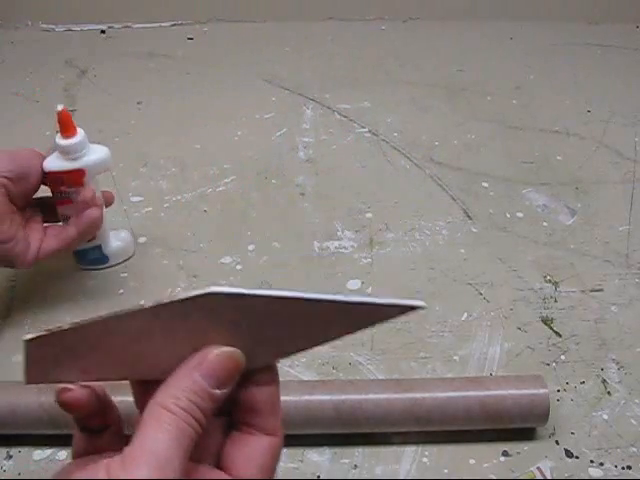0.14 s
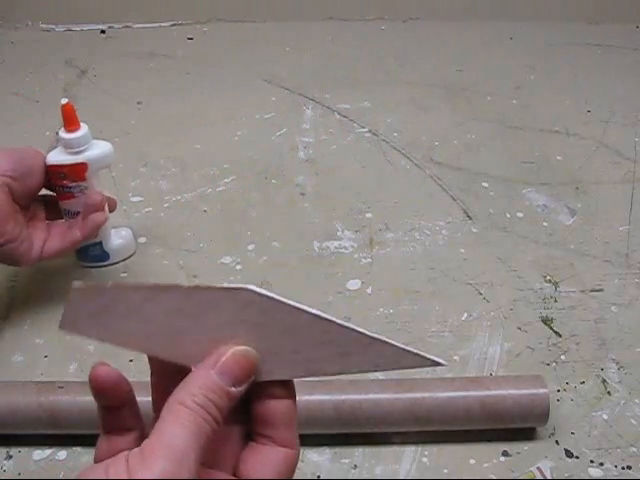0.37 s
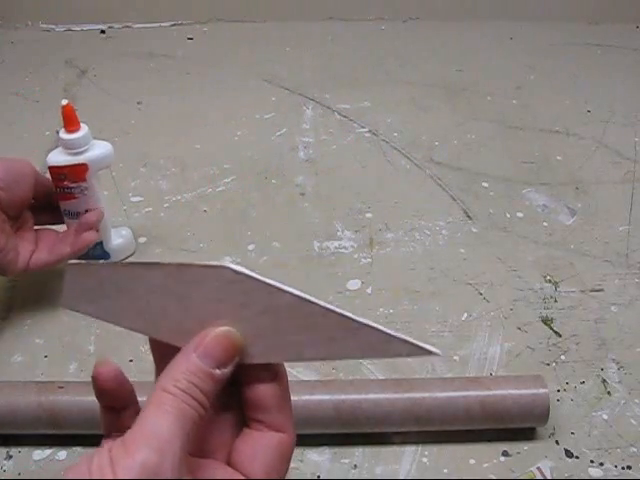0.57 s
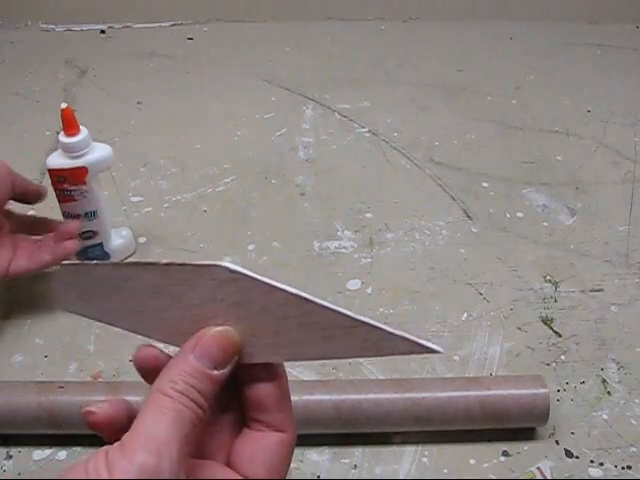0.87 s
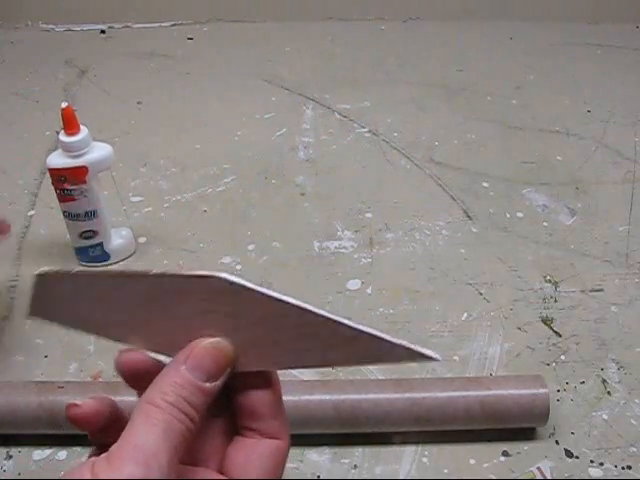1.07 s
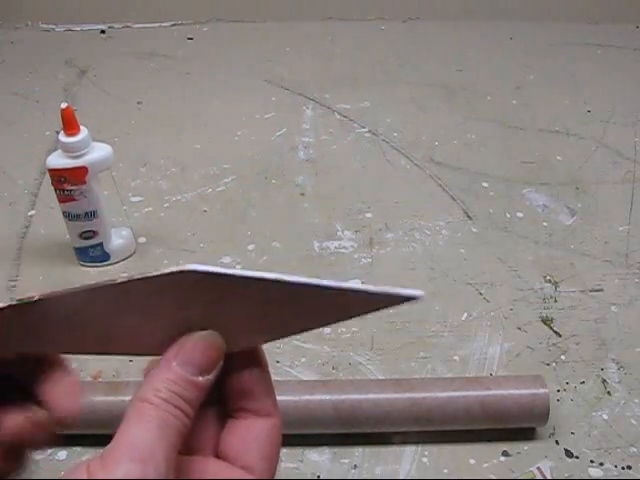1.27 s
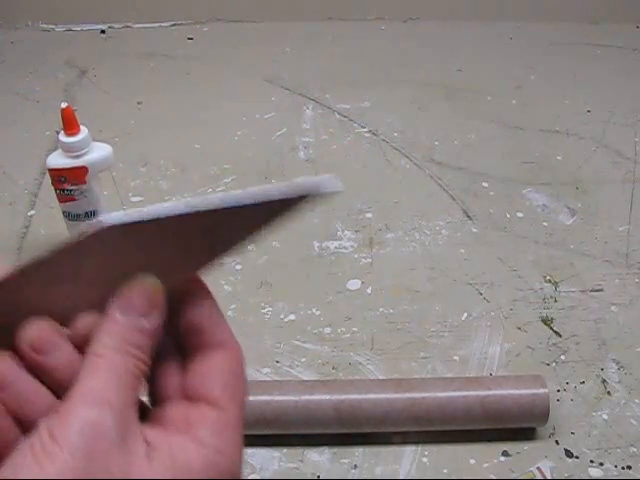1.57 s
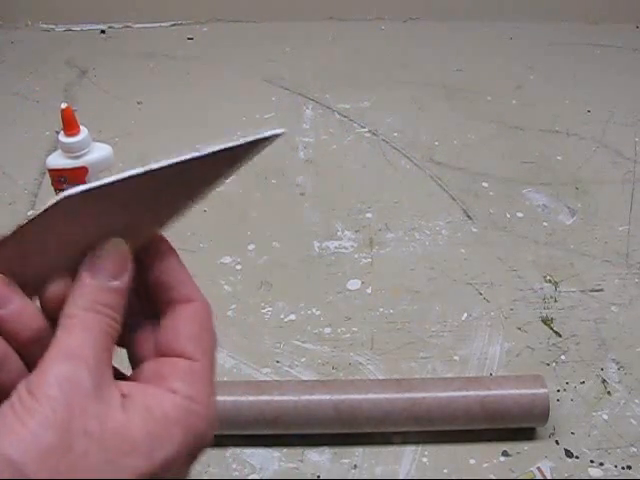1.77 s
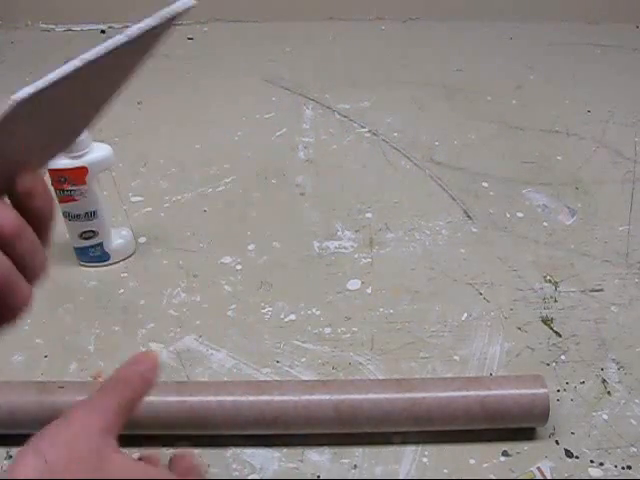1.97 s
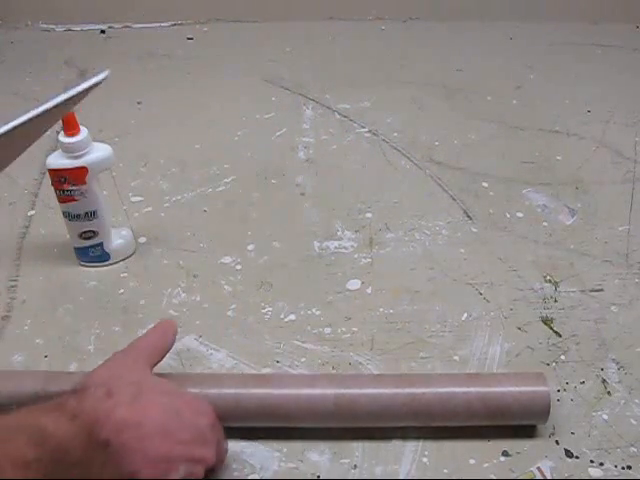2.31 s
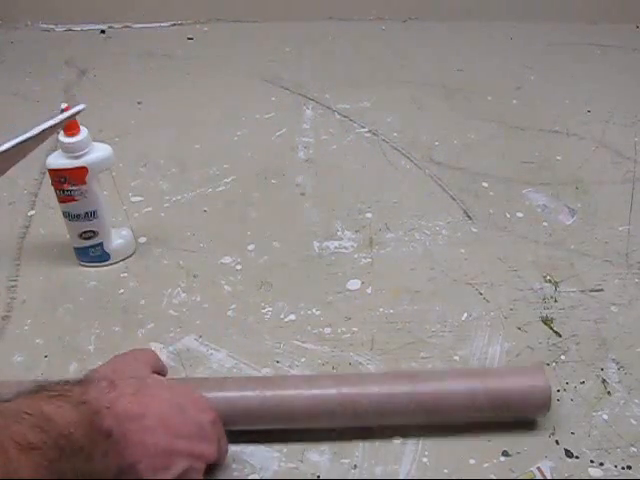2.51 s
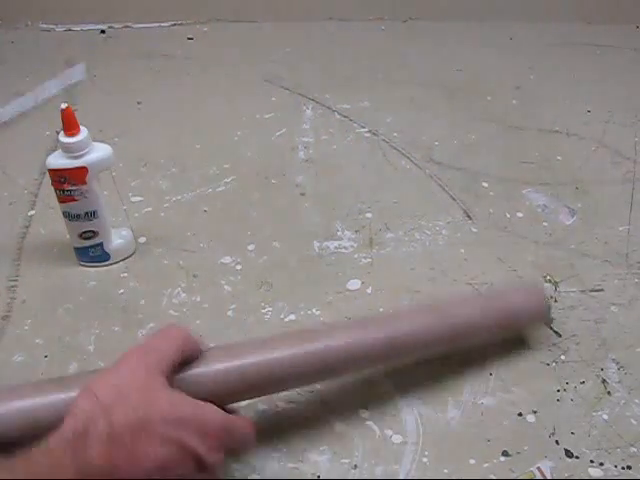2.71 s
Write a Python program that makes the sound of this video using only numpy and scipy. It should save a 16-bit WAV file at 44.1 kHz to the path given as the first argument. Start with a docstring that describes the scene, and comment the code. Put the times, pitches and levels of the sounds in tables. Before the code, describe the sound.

Plastic bottle and cardboard tube knock on a workbench, with light finger rubs and a scrape.

```python
"""A workbench in a small, dry room. A plastic glue bottle lands, rocks flat and is nudged as the fingers
let go; the bench top rings and flexes. Fingers tap and rub a thin wooden blank. A hand bumps a cardboard
tube, which knocks, rings and is dragged off the bench. Impacts are force pulses, rubs and drag are dense
tiny slips; both drive damped modes. The room answers briefly over faint hum and hiss."""
import sys
import numpy as np
from scipy import signal
from scipy.fft import rfft, irfft
from scipy.io import wavfile
from scipy.ndimage import uniform_filter1d

SR = 44100
rng = np.random.default_rng(int(sys.argv[2]) if len(sys.argv) > 2 else 0)


def waveform_to_disk(signal):
    """Save audio, clipped to [-1, 1], as 16-bit WAV at the path in sys.argv[1]."""
    frames = np.transpose(np.atleast_2d(signal))
    scaled = np.clip(frames, -1, 1) * 32767
    samples = np.round(scaled).astype(np.int16)
    wavfile.write(sys.argv[1], SR, samples)


N = 125685
T = np.arange(N) / SR
RING_T = T[:SR * 3 // 4]
TOP_HZ = 7000

# hum partials (frequency [Hz], rms level [dB])
HUM_PARTIALS = [(120, -71.5), (359, -62.5), (482, -61.5), (598, -63), (719, -62.5)]
# spectral shapes (frequency [Hz], relative level [dB])
HISS_SPECTRUM = [(25, -8.5), (250, -7.5), (350, -4), (470, -2.5), (750, -9.5), (850, -9.5), (1500, -11.5),
                 (1870, -8), (2100, -13.5), (3400, -13.5), (4600, -13.5), (7000, -26.5)]
RUB_SPECTRUM = [(150, -2), (600, -2.5), (1100, -4.5), (2000, -2.5), (3300, -3.5), (4500, -3.5),
                (6000, -6.5), (7000, -20)]
BOTTLE_SPECTRUM = [(25, -21), (50, -10), (100, 1), (400, -7.5), (650, -18), (850, -17.5), (1800, -16.5),
                   (3000, -20.5), (5000, -12.5), (7000, -21.5)]
TUBE_SPECTRUM = [(50, -37), (120, 2), (250, -7), (800, 0.5), (1100, -13), (1500, -10.5), (2500, -18.5),
                 (4500, -9.5), (7000, -14)]
DRAG_SPECTRUM = [(80, 2.5), (270, 9), (400, -5.5), (700, 0), (1000, -10.5), (1600, 1), (2700, -5.5),
                 (3700, -5), (5500, -10), (7000, -21)]
# skin on wood and cardboard (peak time [s], level [dB], rise [s], fall [s])
FINGER_RUBS = [(.01, -50, 0.032, 0.047), (.569, -47.5, 0.013, 0.0133), (1.2814, -45, 0.00058, .004),
               (1.477, -40, 0.0013, 0.019), (1.76, -47.5, 0.0028, 0.027), (1.861, -52, 0.049, 0.12),
               (1.88, -40.5, 0.011, 0.0045), (2.26, -42.5, 0.075, 0.046), (2.377, -43, 0.035, 0.039),
               (2.69, -45.5, 0.035, 0.024), (2.84, -45.5, 0.087, 0.072)]
# taps on bottle and blank (time [s], level [dB], frequency [Hz], t60 [s])
FINGER_TAPS = [(.3925, -26.5, 418, 0.038), (.5635, -32, 427, 0.037), (1.2815, -26.5, 3450, 0.009),
               (1.282, -29.5, 4360, 0.0028)]
# contacts with the bench (time [s], level [dB], pulse rise [ms])
BOTTLE_LANDING = [(.2032, 1, 0.091), (.2072, -20, .14), (.2175, -12.5, 0.16), (.2275, -13, 0.11),
                  (.2445, -8, 0.47), (.2582, -18.5, 0.028), (.296, -38.5, .05), (.5632, -20, 0.21)]
BOTTLE_NUDGES = [(.318, -26.5, 2), (.422, -14, 2.2), (.488, -12, 1.5), (.598, -8, 1.52), (.607, -17, 2.1),
                 (.64, -21.5, 0.4), (.72, -8.5, 1.7), (.745, -16.5, 0.41), (.762, -9, 2.1),
                 (.797, -32, 2.2), (.819, -17.5, 1.5)]
TUBE_KNOCKS = [(2.2052, -2.5, 0.071), (2.272, -15.5, 0.084), (2.4074, 2.5, 0.076), (2.480, -13, 1.1),
               (2.534, 5.5, 0.9), (2.5435, -3, 0.63), (2.5625, -3, 0.43), (2.569, -2.5, 1.4)]
# tube sliding on the bench (time [s], level [dB])
DRAG_FORCE = [(2.470, -76.5), (2.472, -31.5), (2.489, -44), (2.502, -36), (2.529, -33.5), (2.56, -28),
              (2.58, -39.5), (2.62, -48.5)]
# modes (frequency [Hz], t60 [s], level [dB])
THIN_WALL_MODES = [(1140, 0.014, -32.5), (2780, 0.02, -25.5), (3360, 0.012, -28.5), (4230, 0.015, -18.5)]  # blank and tube wall
BENCH_TOP_MODES = [(48, 0.24, -36), (88.9, 0.47, -9), (134.6, 0.37, -6.5), (248, 0.42, -7.5),
                   (292.6, 0.22, -3.5), (342, 0.064, -3.5), (378.2, 0.18, 1.5), (427, 0.093, -8.5),
                   (555, 0.15, -5), (597, 0.18, -6.5), (648.4, 0.27, -8)]
BENCH_FLEX_MODES = [(115, 0.41, 0), (169, 0.33, -3.5)]
TUBE_MODES = [(226, 0.19, -5), (248, 0.14, 1), (338.7, 0.11, -3), (520, 0.16, -6), (593, 0.069, -8.5),
              (736, .08, -12), (771, 0.053, -6), (864, .13, -8), (1099, 0.087, -6), (1164, 0.12, -16.5),
              (1356, .15, -30.5), (1960, 0.11, -15.5)]
# struck-body response (thud [dB], modes [dB], diffuse ring [dB], its bass t60 [s], its treble t60 [s])
BOTTLE_RESPONSE = (6, -18, 8, 0.6, 0.37)
TUBE_RESPONSE = (1, -28, -6.5, 1, 2.2)
# nearby surfaces (delay [s], gain [ratio])
BOTTLE_REFLECTIONS = [(.0043, 0.086), (0.0119, 0.11)]
TUBE_REFLECTIONS = [(.0039, 0.25), (0.0121, 0.39), (0.0143, .45), (.0226, .25)]


def undb(db):
    """Decibels to gain."""
    return 10 ** (np.asarray(db) / 20)


def unit_rms(x):
    """Scale to rms 1."""
    return x / np.sqrt(np.mean(x ** 2))


def through(x, response):
    """Convolve with an impulse response."""
    return signal.fftconvolve(x, response)[:N]


def low_cut(x, hz):
    """High-pass: removes deep bass below the given frequency."""
    return signal.sosfilt(signal.butter(2, hz, "high", fs=SR, output="sos"), x)


def colour(spectrum, size=4096):
    """Minimum-phase, unit-energy response of a spectrum, rolled off above TOP_HZ."""
    hz, db = np.array(spectrum).T
    bin_hz = np.arange(size // 2 + 1) * SR / size
    gain = undb(np.interp(np.log(bin_hz + 1), np.log(hz), db))
    gain /= np.hypot(1, (bin_hz / TOP_HZ) ** 2)
    cepstrum = irfft(np.log(gain))
    cepstrum[1:size // 2] *= 2
    cepstrum[size // 2 + 1:] = 0
    response = irfft(np.exp(rfft(cepstrum)))
    return response / np.linalg.norm(response)


def mode(age_s, hz, t60_s):
    """Damped sine, silent before age 0."""
    age_s = np.maximum(age_s, 0)
    return np.sin(2 * np.pi * hz * age_s) * np.exp(-np.log(1000) * age_s / t60_s)


def ringing(modes):
    """Impulse response of modes, alternating in sign."""
    return sum((-1) ** k * undb(db) * mode(RING_T, hz, t60_s) for k, (hz, t60_s, db) in enumerate(modes))


def diffuse(bass_t60_s, treble_t60_s, build_s=0.001):
    """Countless weak modes: octave bands of noise, each with its own decay."""
    size = len(RING_T)
    noise = rfft(rng.standard_normal(size))
    bin_hz = np.arange(len(noise)) * SR / size
    octave = np.log2(bin_hz / 60 + 1e-6).clip(0, 7)
    ring = 0
    for k, t60_s in enumerate(np.geomspace(bass_t60_s, treble_t60_s, 8)):
        band = irfft(noise * np.maximum(1 - abs(octave - k), 0), size)
        ring += band * np.exp(-np.log(1000) * RING_T / t60_s)
    ring *= 1 - np.exp(-RING_T / build_s)
    return ring / np.linalg.norm(ring)


def background(hiss_db=-49.5, drift_ratio=0.00383):
    """Slightly wavering hum, steady hiss."""
    hum = 0
    for hz, db in HUM_PARTIALS:
        drift = unit_rms(uniform_filter1d(rng.standard_normal(N), size=8000))
        phase = 2 * np.pi * np.cumsum(hz * (1 + drift_ratio * drift)) / SR
        hum += undb(db) * np.sqrt(2) * np.sin(phase)
    hiss = unit_rms(through(rng.standard_normal(N), colour(HISS_SPECTRUM)))
    return hum + undb(hiss_db) * hiss


def friction(spread_db, slips_per_s=2500):
    """Dense tiny slips, random in time and sign."""
    slips = rng.random(N) < slips_per_s / SR
    return unit_rms(slips * rng.choice([-1, 1], N) * undb(spread_db * rng.standard_normal(N)))


def finger_rubs(hiss_db=3):
    """Skin slips under swelling, fading pressure; thin walls resonate."""
    pressure = sum(undb(db) * np.exp(-np.maximum((peak_s - T) / rise_s, (T - peak_s) / fall_s))
                   for peak_s, db, rise_s, fall_s in FINGER_RUBS)
    slips = low_cut(pressure * friction(spread_db=1.5), hz=550)
    hiss = undb(hiss_db) * through(slips, colour(RUB_SPECTRUM))
    return hiss + through(slips, ringing(THIN_WALL_MODES))


def contact_force(contacts):
    """One pulse per contact; longer is duller."""
    force = np.zeros(N)
    for start_s, db, rise_ms in contacts:
        age = np.maximum(T - start_s, 0) * 1000 / rise_ms
        pulse = age * np.exp(-np.minimum(age, 60))
        force += undb(db) * pulse / pulse.sum()
    return force


def strike(force, modes, spectrum, response):
    """Struck body: short thud, diffuse ring, distinct modes."""
    thud_db, modes_db, diffuse_db, bass_t60_s, treble_t60_s = response
    thud = through(force, colour(spectrum))
    ring = through(thud, diffuse(bass_t60_s, treble_t60_s))
    tones = through(force, ringing(modes))
    return undb(diffuse_db) * ring - undb(thud_db) * thud + undb(modes_db) * tones


def reflected(x, reflections):
    """Direct sound plus echoes off nearby surfaces."""
    return x + sum(gain * np.interp(T - delay_s, T, x, left=0) for delay_s, gain in reflections)


def bench_flex(force, build_s=0.0087):
    """Deep modes of the whole bench; its mass is slow to start swinging."""
    return through(force, ringing(BENCH_FLEX_MODES) * (1 - np.exp(-RING_T / build_s)))


def bottle(flex_db=-27):
    """Bottle lands, rocks and is nudged; the bench rings and flexes."""
    force = contact_force(BOTTLE_LANDING) + contact_force(BOTTLE_NUDGES)
    knocks = strike(force, BENCH_TOP_MODES, BOTTLE_SPECTRUM, BOTTLE_RESPONSE)
    return reflected(knocks, BOTTLE_REFLECTIONS) + undb(flex_db) * bench_flex(force)


def finger_taps():
    """Each light tap rings one short mode."""
    return sum(undb(db) * mode(T - start_s, hz, t60_s) for start_s, db, hz, t60_s in FINGER_TAPS)


def tube_knocks(flex_db=-33):
    """Tube hits the bench and rings; the bench adds the bass."""
    force = contact_force(TUBE_KNOCKS)
    knocks = reflected(strike(force, TUBE_MODES, TUBE_SPECTRUM, TUBE_RESPONSE), TUBE_REFLECTIONS)
    return low_cut(knocks, hz=116) + undb(flex_db) * bench_flex(force)


def tube_drag(modes_db=-27, flex_db=-34):
    """Tube scrapes along the bench; the slips excite both."""
    time_s, db = np.array(DRAG_FORCE).T
    sliding = (T > time_s[0]) & (T < time_s[-1])
    slips = friction(spread_db=0) * undb(np.interp(T, time_s, db)) * sliding
    scrape = through(slips, colour(DRAG_SPECTRUM)) + undb(modes_db) * through(slips, ringing(TUBE_MODES))
    return low_cut(scrape, hz=52) + undb(flex_db) * bench_flex(slips)


def scene(room_db=-14, room_t60_s=0.24):
    """Handling sounds and short reverb over the background; mono."""
    near = bottle() + tube_drag() + tube_knocks() + finger_rubs() + finger_taps()
    room = undb(room_db) * through(near, diffuse(room_t60_s, room_t60_s))
    return (near + room + background())[None]


def record(dry):
    """Small microphone: dull top, steep cut, slight DC offset."""
    rolloff_hz, dc_offset = 6100, 0.0048
    dulled = signal.sosfilt(signal.butter(3, rolloff_hz, fs=SR, output="sos"), dry)
    return signal.sosfilt(signal.ellip(8, .3, 70, TOP_HZ, fs=SR, output="sos"), dulled) + dc_offset


dry = scene()
out = record(dry)
waveform_to_disk(out)
```